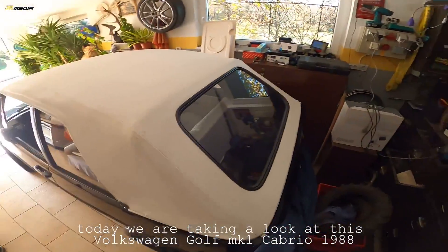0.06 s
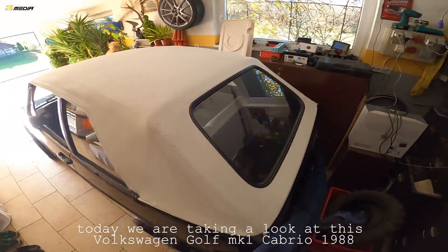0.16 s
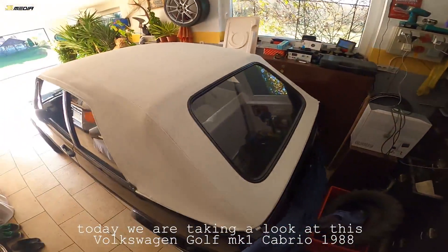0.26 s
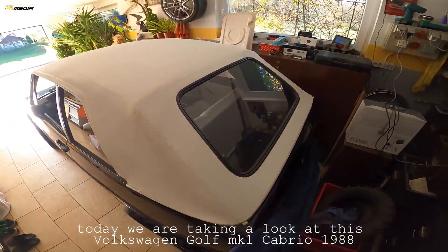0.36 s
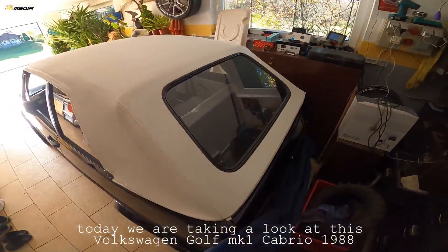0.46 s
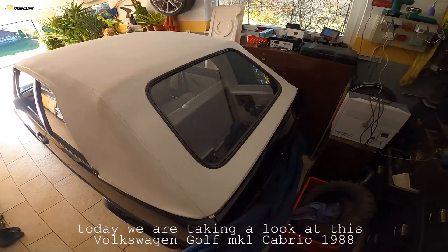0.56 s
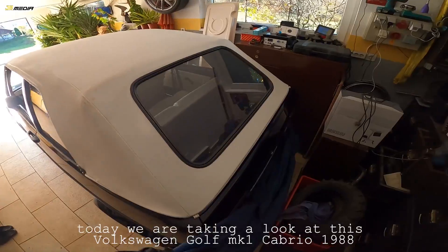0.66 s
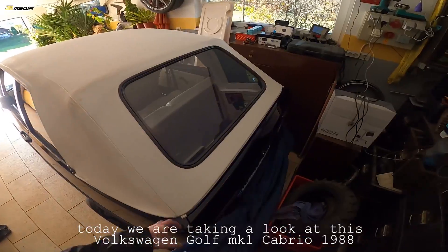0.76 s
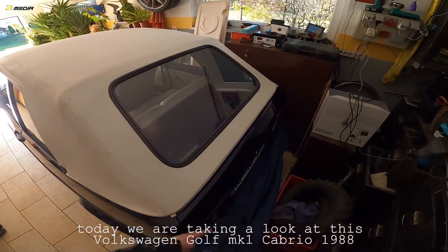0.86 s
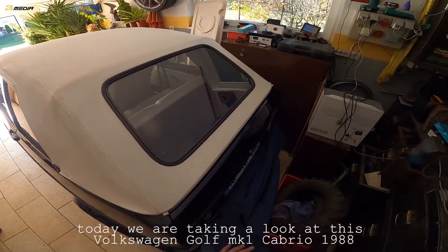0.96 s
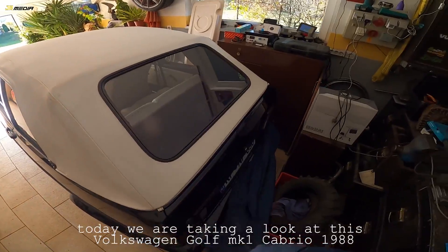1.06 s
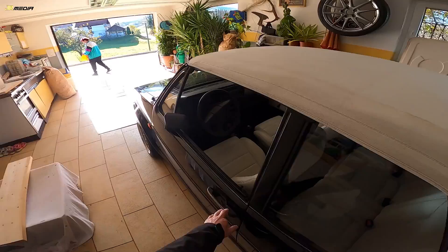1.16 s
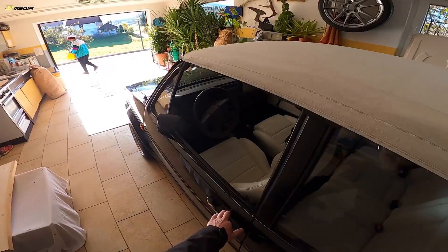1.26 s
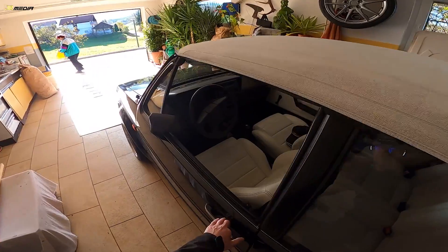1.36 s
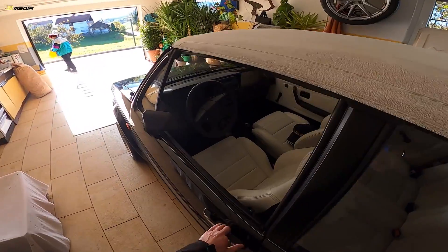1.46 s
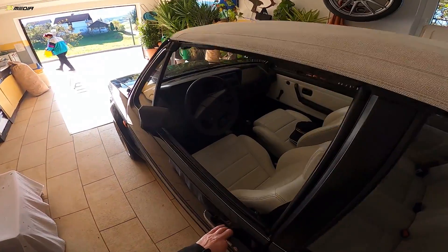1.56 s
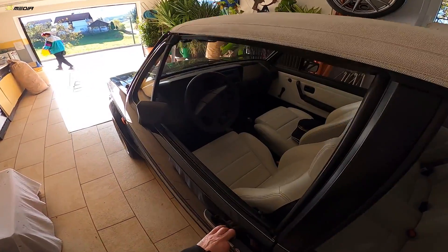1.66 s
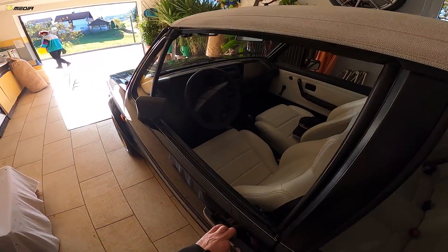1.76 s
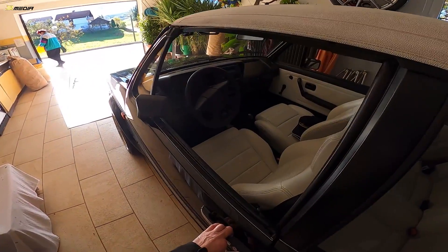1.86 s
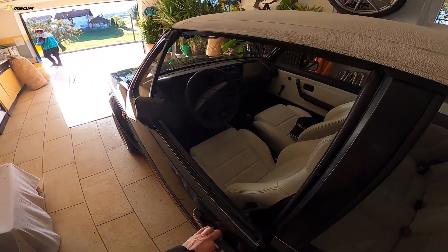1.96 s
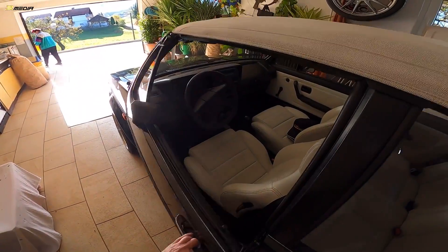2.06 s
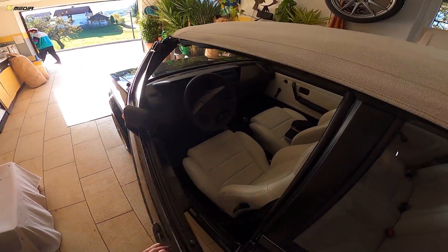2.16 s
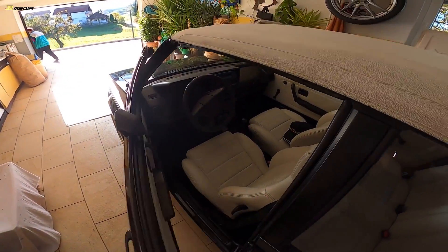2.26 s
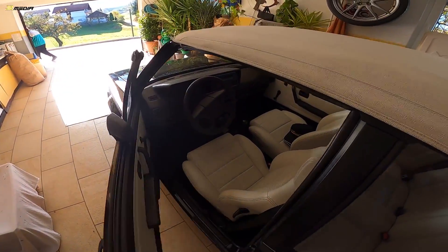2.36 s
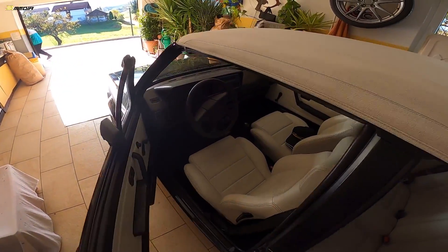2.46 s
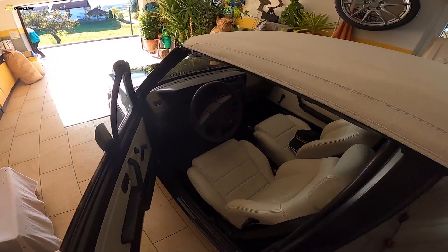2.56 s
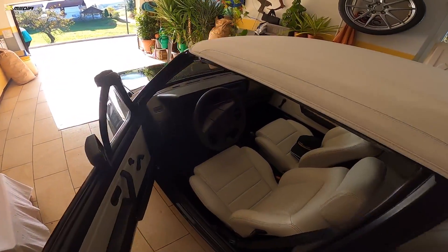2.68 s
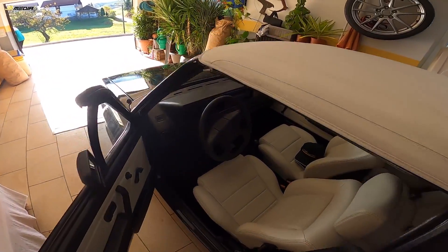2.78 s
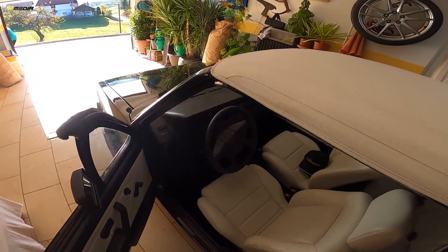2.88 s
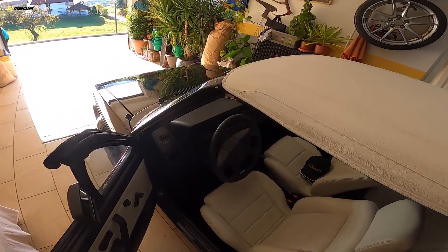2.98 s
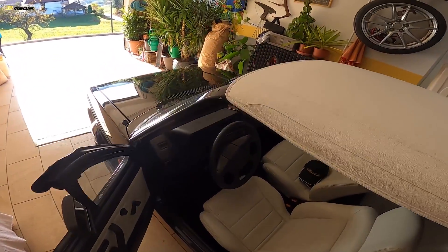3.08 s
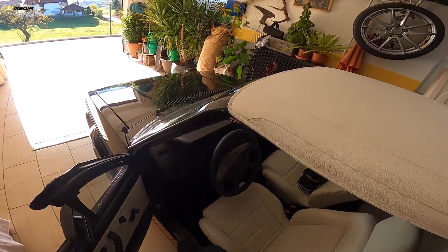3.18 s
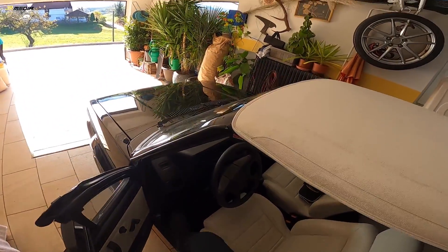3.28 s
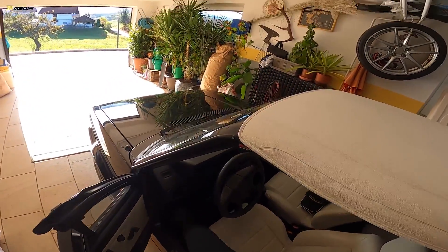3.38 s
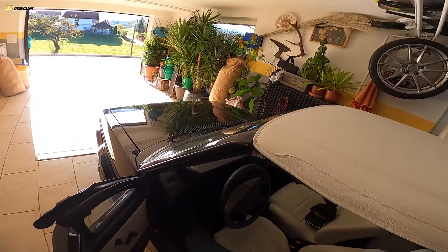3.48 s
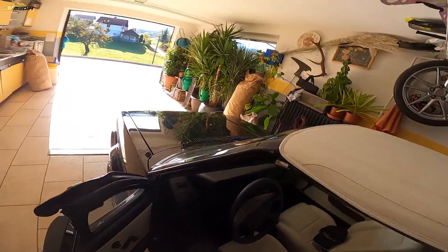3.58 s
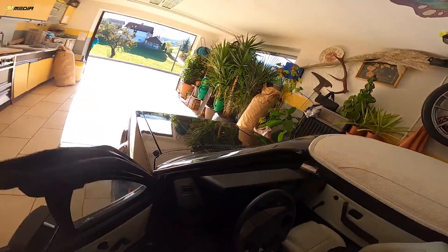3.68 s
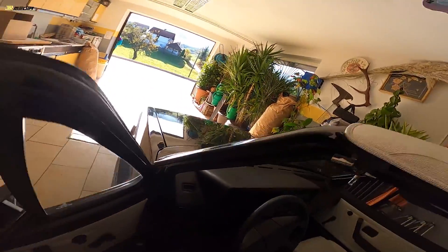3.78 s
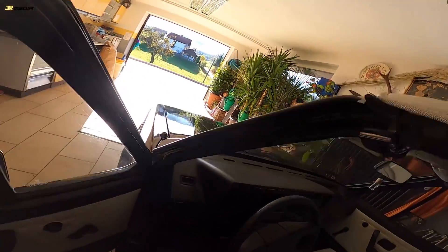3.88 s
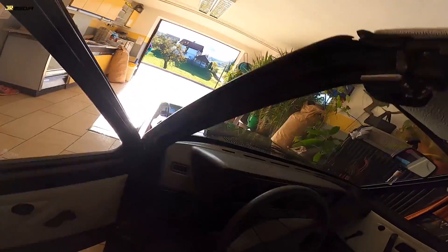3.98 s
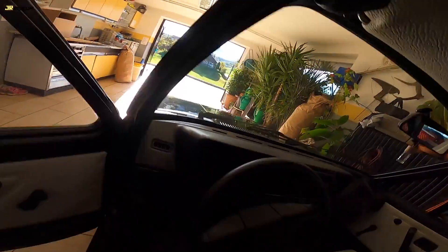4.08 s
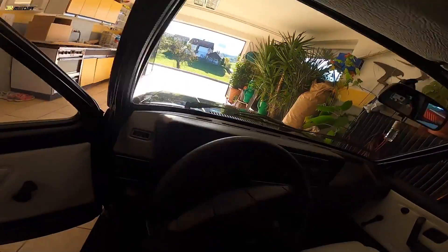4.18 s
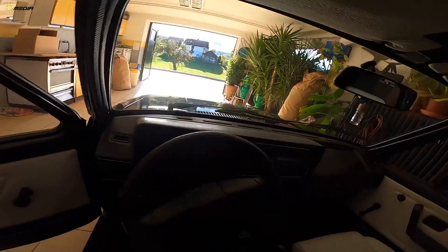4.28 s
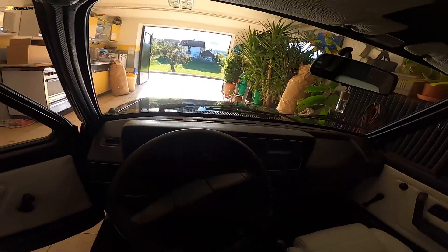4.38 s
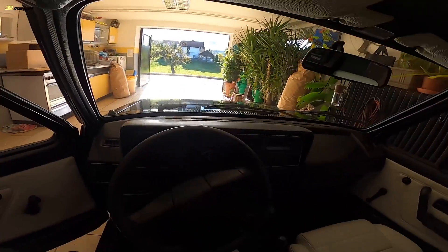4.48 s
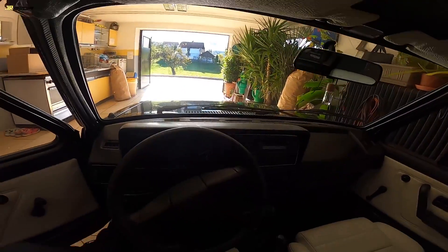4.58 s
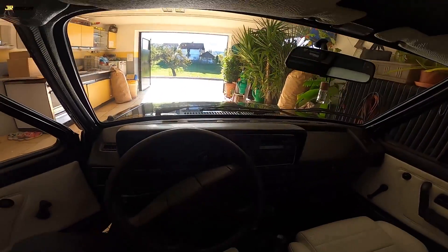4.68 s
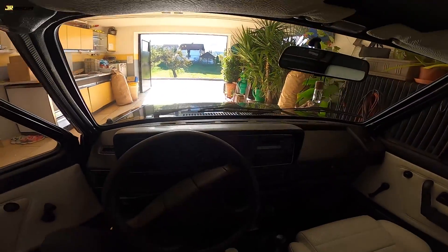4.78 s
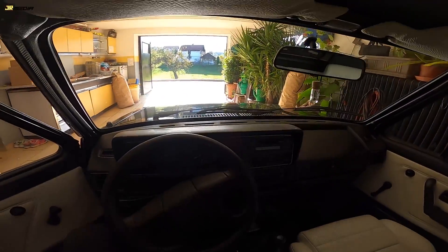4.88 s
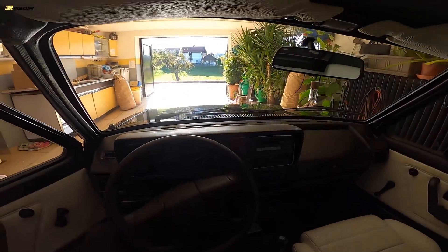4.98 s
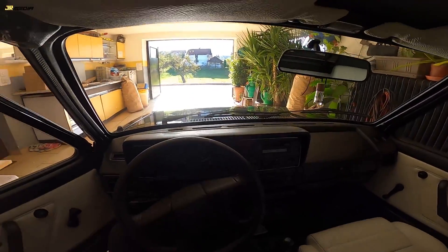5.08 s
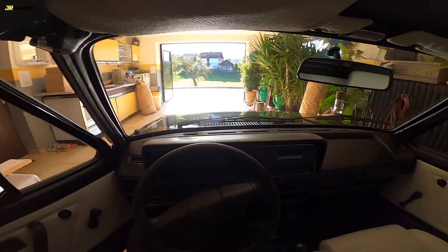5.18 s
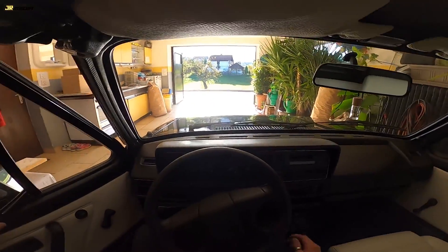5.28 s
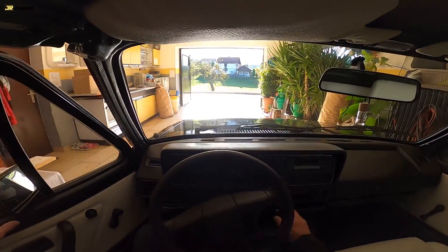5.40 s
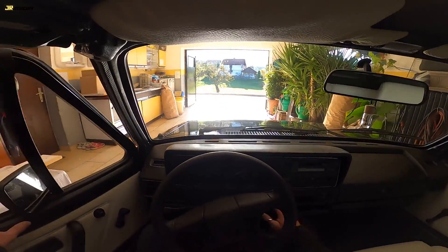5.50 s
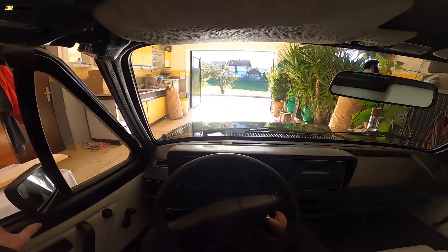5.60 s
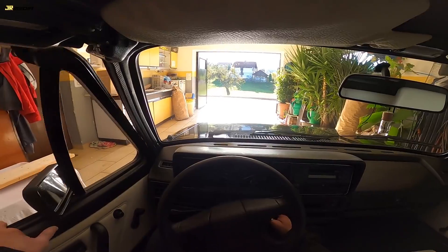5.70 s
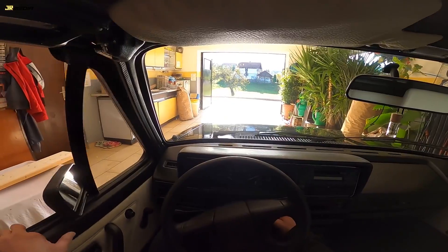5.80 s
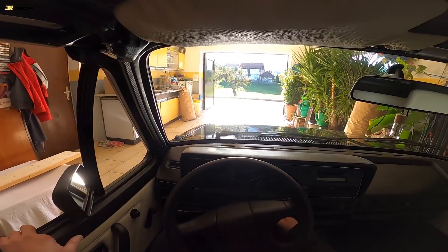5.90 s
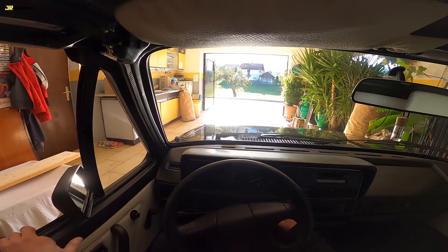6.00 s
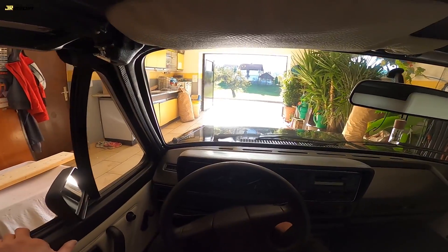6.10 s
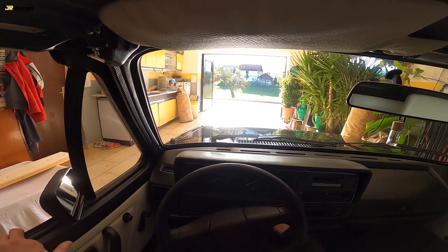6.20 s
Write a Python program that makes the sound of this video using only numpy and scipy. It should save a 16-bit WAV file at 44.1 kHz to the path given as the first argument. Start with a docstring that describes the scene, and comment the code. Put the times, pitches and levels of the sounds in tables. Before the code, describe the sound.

A body-worn microphone catches close nylon rustle and low cloth rubbing in a tiled garage, over very faint air noise. Fabric swishes upward around 0.7 s, and a rubber sole gives three tiny squeaks at 1.0 s. From 1.4 s the handle is felt with light clicks and soft knocks; a bright click and brief spring chatter come at 1.77, a dull bump at 1.93, then the steel latch snaps at 2.07. Cloth moves as the door swings, with a stiff snap at 2.94. Nylon swishes at 3.3, a solid thump lands at 3.94, and clustered thuds with low rocking and leathery seat creaks follow at 4.2-4.35. Quieter settling brings snaps and ticks until 5.4. A firm double knock hits at 5.67, then the door slams at 6.0, by far the loudest: latch crack, deep boom, and rattling rebounds with a short reflective tail.

```python
"""Close cloth rustle from a body-worn microphone: someone in a nylon jacket walks up to an old car in a tiled garage.
An arm's length away the handle clicks and the door is pulled open; they drop into the creaking seat, shift and slam it.
Damped sines and rung modes make the thuds, latch, spring and seat; dying noise bursts add the clicks and rattles.
Filtered noise that swells with each move makes the clothes, gliding blurred tones the squeak and nylon swishes.
Tiles return dense reflections of the hard sounds, over low rocking and faint air noise."""
import sys
import numpy as np
from scipy import signal
from scipy.fft import rfft, irfft, next_fast_len
from scipy.io import wavfile
from scipy.ndimage import uniform_filter1d, minimum_filter1d

SR = 44100
rng = np.random.default_rng(int(sys.argv[2]) if len(sys.argv) > 2 else 0)


def persist_wave(psi):
    """Save psi, clipped to +-1, as 16-bit WAV."""
    counts = np.round(np.clip(psi, -1, 1) * 32767).astype(np.int16)
    wavfile.write(sys.argv[1], SR, np.atleast_2d(counts).T)


N = 275404
TIME = np.arange(N) / SR   # s

# Event levels are relative dB, ahead of filters and mix; positive left-right dB leans left.
# Blows on the car and footfalls; from 6.044 s the door rebounds in its seals. Each row: start in seconds,
# knock level in dB, knock pitch in Hz, knock t60 in seconds, cabin boom in dB, rattle in dB,
# rattle brightness in Hz, rattle t60 in seconds.
THUD_EVENTS = [(1.423, -33.5, 235, 0.2, -57.5, -35, 600, 0.43),
               (1.664, -40, 273, 0.16, -64, -47, 400, 0.18), (1.760, -35.5, 233, 0.18, -74, -35, 594, 0.27),
               (1.855, -27.5, 234, 0.15, -65, -28, 500, 0.13),
               (1.926, -24.5, 135.5, 0.33, -30.5, -20.5, 1780, 0.16),
               (2.066, -49, 163, 0.18, -39, -32, 1510, 0.42),
               (2.48, -36.5, 191.6, 0.39, -77, -35.5, 700, 0.32),
               (3.191, -36, 182, 0.11, -53.5, -42, 590, 0.26), (3.409, -47, 154, 0.2, -68, -47, 350, 0.21),
               (3.795, -25, 206, 0.21, -60, -36, 400, 0.15), (3.866, -32, 122, 0.23, -49, -38, 1400, 0.065),
               (3.938, -11, 137, 0.084, -21.5, -21, 980, 0.1), (3.965, -21, 190, 0.065, -43, -36, 800, .08),
               (4.014, -53, 126, 0.098, -25.5, -52, 500, .1), (4.134, -31, 131, 0.2, -29.5, -40, 600, 0.18),
               (4.254, -16.5, 134.8, 0.35, -37, -24, 1400, 0.18),
               (4.257, -13.5, 205, 0.148, -45, -34, 1500, 0.042),
               (4.281, -20, 174, .08, -45, -20, 1400, .06),
               (4.303, -18.5, 281, 0.073, -43, -24, 1010, 0.11),
               (4.318, -13.5, 283, 0.043, -50, -21.5, 1300, 0.07),
               (4.831, -33.5, 167.5, 0.18, -42, -43, 500, 0.35),
               (5.251, -30.5, 202, 0.1, -47, -42, 400, 0.11), (5.437, -28.5, 187, 0.12, -46, -65, 396, .1),
               (5.6672, -7, 138, 0.12, -50, -19.5, 1280, 0.12),
               (5.68, -9.5, 205, 0.11, -38, -21, 1200, 0.078),
               (5.697, -24, 200, 0.067, -54, -21.5, 1480, 0.089),
               (5.728, -28.5, 504, 0.078, -63, -30, 800, 0.062),
               (5.775, -11.5, 127, 0.087, -42, -27, 1200, 0.18),
               (5.984, -23.5, 125, 0.12, -23.5, -49, 500, 0.096),
               (6.002, 0, 194.7, 0.11, -6, -16, 1820, 0.42), (6.011, -15, 210, .55, -2, -10, 463, 0.9),
               (6.044, -7.5, 295, 0.076, -27, -12, 2000, 0.23),
               (6.062, -2, 176, 0.079, -26, -28, 900, 0.15), (6.074, -10, 217, 0.13, -38, -16, 1300, 0.19),
               (6.098, -11.5, 364, 0.13, -24.5, -21.5, 1770, 0.23),
               (6.12, -7, 175, 0.12, -17, -21, 800, 0.13), (6.189, -19.5, 131, 0.15, -19, -44, 500, 0.12)]
# Steel catches of the lock and the door stay. Each row: start in seconds, lock ring in dB, door skin ring in dB,
# crack in dB, crack t60 in seconds, left-right balance in dB.
CATCH_EVENTS = [(1.929, -33, -36, -53, 0.025, 2), (2.066, -13, -52, -26.5, 0.02, 1.5),
                (2.070, -22.5, -50, -24, 0.043, 0.5), (2.086, -38, -48.5, -39, 0.027, 0),
                (5.671, -50, -39, -36.5, 0.037, -1), (5.976, -26, -45, -20, 0.027, 7.5),
                (5.986, -26, -51, -24.5, 0.098, 6), (5.998, -17.5, -29.5, -21.5, 0.19, 2.5),
                (6.047, -36, -29.5, -32, 0.04, 10)]
# Small clicks of handle, buckle and trim. Each row: start in seconds, level in dB, brightness in Hz,
# t60 in seconds, left-right balance in dB.
CLICK_EVENTS = [(1.422, -36, 5000, 0.05, 1.5), (1.568, -37.5, 4500, 0.012, 4),
                (1.753, -31.5, 7000, 0.024, 0.5), (1.769, -21.5, 14000, 0.012, 0),
                (1.773, -35.5, 6000, 0.1, 2), (1.849, -34.5, 3900, 0.064, 3),
                (1.921, -28.5, 4500, 0.062, -6), (1.926, -28, 8600, 0.028, 5),
                (2.051, -28, 3500, 0.021, -1), (2.187, -31, 4750, 0.072, 1.5),
                (2.442, -35.5, 10000, 0.04, 1), (2.452, -37, 12200, 0.14, 0), (2.478, -27, 5630, 0.057, 2),
                (3.856, -37, 1900, 0.048, 3), (3.915, -37, 2500, 0.12, 5), (3.932, -29, 3640, 0.042, 4),
                (4.465, -38.5, 2980, 0.056, 4), (4.791, -39.5, 4500, 0.039, 5),
                (5.699, -37, 3537, 0.025, 16), (5.795, -40, 4630, 0.071, 2.5),
                (5.86, -37.5, 2600, 0.042, 1)]
# Dry snaps of the door stay, trim and seat frame. Each row: start in seconds, level in dB, pitch in Hz,
# after-rattle level in dB, after-rattle t60 in seconds.
SNAP_EVENTS = [(2.865, -35, 1300, -44.5, 0.04), (2.9405, -19.5, 1960, -38, 0.074),
               (3.199, -34, 1500, -43, 0.02), (3.784, -37, 810, -45, .03), (3.9324, -17.5, 660, -38, .05),
               (4.586, -19.5, 477, -36.5, 0.036), (4.8924, -25, 1290, -44, .04),
               (4.8954, -29, 1700, -36, 0.034), (4.9375, -27, 1200, -36, 0.075),
               (4.944, -37, 950, -48, .03), (5.305, -29, 750, -36.5, .035)]
# Seat springs and leather give way under the weight. Each row: peak in seconds, rise in seconds, fall in seconds,
# level in dB.
CREAK_SWELLS = [(4.19, 0.046, .06, -44), (4.258, .012, 0.019, -32), (4.305, 0.037, 0.057, -28),
                (4.49, 0.071, 0.062, -42), (4.68, 0.16, 0.32, -49.5)]
# Single ticks of the seat frame. Each row: start in seconds, level in dB.
SEAT_TICK_EVENTS = [(4.699, -48), (4.845, -43.5), (5.211, -55.5), (5.327, -52)]
# Body moves: steps to the car, feeling for and pulling the handle (1.75, 2.03 s), swinging the door open (2.36 s),
# a leg going in (3.43 s), sliding on and settling (4.27, 4.72 s), reaching for the door (5.67 s).
# Each row: peak in seconds, rise in seconds, fall in seconds, cloth rustle in dB, low rubbing in dB re rustle,
# nylon hiss in dB re rustle.
BODY_MOVES = [(0.052, 0.077, 0.12, -41.5, -8, -9), (0.22, 0.47, 0.95, -47, -2.5, -14.5),
              (0.5, 0.051, 0.089, -47.5, 4.5, -34), (0.74, 0.21, 0.16, -39.5, -5.5, -10.5),
              (1.199, 0.34, 0.18, -44.5, -4.5, -12), (1.222, 0.033, 0.0064, -45, 0, -12),
              (1.75, 1, 0.22, -58.5, 3, -5), (2.03, 0.2, 0.085, -46, 3, -16.5),
              (2.36, 0.22, 0.4, -52, 3, -1), (2.84, 0.2, 0.087, -61, 7.5, 1.5),
              (3.429, 0.14, 0.15, -46.5, -0.5, -5.5), (3.7, 0.16, 0.11, -52.5, -32, -9),
              (3.96, 0.062, 0.055, -43, 7.5, -20), (4.271, 0.18, 0.089, -37, 0, -16),
              (4.72, 0.71, 0.39, -52, 4.5, -3), (5.25, 0.59, 0.17, -54, 1, -6),
              (5.67, 0.6, 0.091, -52, -11, -7), (5.96, 0.081, 0.098, -56, 5, 1)]
# Nylon brushes over nylon. Each row: start in seconds, length in seconds, starting pitch in Hz,
# pitch aimed for in Hz, level in dB.
NYLON_SWISHES = [(.66, 0.17, 1200, 3100, -45), (.965, 0.065, 2384, 2620, -47.5),
                 (3.31, .32, 2700, 3204, -44.5)]
# Nylon ribs whistle faintly as the leg lifts. Each row: start in seconds, length in seconds, starting pitch in Hz,
# pitch aimed for in Hz, level in dB.
RIB_WHISTLES = [(3.24, .17, 6000, 11000, -67)]
# A rubber sole catches three times on the tiles. Each row: start in seconds, length in seconds,
# starting pitch in Hz, pitch aimed for in Hz, level in dB.
SOLE_SQUEAKS = [(.977, 0.041, 1247, 1410, -43), (1.012, 0.042, 1400, 1430, -43),
                (1.051, .036, 1480, 1530, -43.5)]
# Steps jog the microphone mount; the car rocks when pulled, loaded or slammed. Each row: peak in seconds,
# rise in seconds, fall in seconds, level in dB.
ROCKING_SWELLS = [(.77, 0.11, 0.21, -46), (2.09, 0.11, 0.12, -44), (2.965, 0.038, 0.052, -49.5),
                  (3.88, 0.051, 0.05, -38), (4.23, 0.19, 0.25, -26), (4.8, 0.59, 0.68, -40.5),
                  (5.85, 0.048, 0.087, -37), (6.05, 0.031, 0.7, -20)]

# Ringing modes of the cabin air. Each row: pitch in Hz, level in dB, t60 in seconds.
CABIN_MODES = [(33.1, -5, 0.9), (59.3, 5.5, 0.28), (47, -2.5, 0.26)]
# Ringing modes of the steel lock. Each row: pitch in Hz, level in dB, t60 in seconds.
LOCK_MODES = [(945, -19, 0.17), (1025, -18, 0.18), (1118, -15.5, 0.11), (1235, -16, 0.074),
              (1500, -13.5, 0.03), (1916, -8, 0.018), (2160, -1, 0.023), (2044, -22, 0.13),
              (2244, -22.5, 0.15), (2330, -20, 0.05), (2630, -15.5, 0.058), (3320, -23, 0.084),
              (4030, -35, 0.11), (5590, -22, 0.085), (7370, -24, .12), (8550, -27, .04)]
# Ringing modes of the door's sheet metal. Each row: pitch in Hz, level in dB, t60 in seconds.
DOOR_SKIN_MODES = [(180.3, -4.5, 0.35), (210, -0.5, 0.37), (266, -11, 0.44), (323, -5, 0.5),
                   (390.5, -10.5, 0.32), (460, -3, 0.35), (484, 3, 0.27), (586, 3, 0.26), (638, 2.5, 0.2),
                   (778, -5, 0.4), (960, -24, 0.48), (1200, 1, 0.15)]
# Ringing modes of the handle's return spring. Each row: pitch in Hz, level in dB, t60 in seconds.
SPRING_MODES = [(1270, -13, 0.091), (1520, -9, 0.11), (3180, -2, 0.035), (3420, -3, 0.03),
                (3850, -3, 0.027), (7000, 2, 0.008)]
# Ringing modes of the seat. Each row: pitch in Hz, level in dB, t60 in seconds.
SEAT_MODES = [(300, -4, 0.11), (500, -10, 0.05), (776, 1, 0.031), (950, 6, 0.027), (1116, -2, 0.026),
              (1235, -0.5, 0.043), (1362, -0.5, 0.046), (1650, -3, 0.018), (2500, -11, 0.033),
              (3300, -15, 0.015)]
# Ringing modes of the key ring. Each row: pitch in Hz, level in dB, t60 in seconds.
KEY_MODES = [(11540, -41, .11), (12460, -49, .1)]

# Spectrum of glass and trim shaking. Each row: frequency in Hz, density in dB per Hz.
RATTLE_SPECTRUM = [(40, -39), (100, 2.5), (160, 5.5), (250, 4), (480, 2), (750, -5), (1200, -2.5),
                   (2500, -7.5), (5000, -3.5), (9000, -3), (14000, -9.5)]
# Spectrum of steel cracking on steel. Each row: frequency in Hz, density in dB per Hz.
CRACK_SPECTRUM = [(200, -53), (700, -21), (1200, 4.5), (2100, 10.5), (3100, 2.5), (4000, 4.5), (5500, -5.5),
                  (8000, 3), (10000, -11), (14000, -34)]
# Spectrum of light parts clicking. Each row: frequency in Hz, density in dB per Hz.
CLICK_SPECTRUM = [(100, -8), (500, 5.5), (1500, 9.5), (3200, 7), (4800, 4.5), (7200, 2.5), (9500, -5.5),
                  (14000, -19)]
# Spectrum of low rubbing of the clothes. Each row: frequency in Hz, density in dB per Hz.
RUB_SPECTRUM = [(60, -22), (130, -6.5), (240, 3), (400, -2.5), (700, -14.5), (1500, -48.5)]
# Spectrum of cloth rustle. Each row: frequency in Hz, density in dB per Hz.
CLOTH_SPECTRUM = [(200, -24), (500, -3), (1200, 4.5), (2000, 0.5), (3100, -3), (4500, -8), (9000, -50.5)]
# Spectrum of nylon hiss. Each row: frequency in Hz, density in dB per Hz.
NYLON_SPECTRUM = [(1500, 5), (3500, 2.5), (5000, 7.5), (6300, 4.5), (8000, 4.5), (9500, -6.5), (12200, -10),
                  (15000, -27)]
# Spectrum of mount and car rumble. Each row: frequency in Hz, density in dB per Hz.
RUMBLE_SPECTRUM = [(15, -10), (32, 7.5), (55, -0.5), (85, -8), (140, -9.5), (400, -69.5)]
# Spectrum of the faint air noise. Each row: frequency in Hz, density in dB per Hz.
AIR_SPECTRUM = [(25, -6), (80, -9), (200, -2), (600, -16), (1500, 5.5), (4000, -4.5), (8000, -11),
                (10000, -18), (15000, -37)]
# How unlike the two ears are. Each row: frequency in Hz, side level in dB re mid.
STEREO_WIDTH = [(60, -10.5), (150, -24), (500, -14.5), (1500, -8.5), (4000, -3), (8000, -42), (14000, -28)]
# Decay of the garage. Each row: frequency in Hz, t60 in seconds.
GARAGE_DECAY = [(100, 0.42), (400, 0.2), (1500, 0.2), (5000, 0.22), (12000, 0.16)]

CHATTER_DB, CHATTERS_PER_S = 2.5, 300   # unevenness of loose parts colliding, and its rate
SNAP_CYCLES, REBOUND_S, REBOUND_DB = 4.1, 0.0012, -17.5   # cycles until a snap is 60 dB down; one bounce
SPRING_S, SPRING_DB, SPRING_GAP_S, SPRING_LOSS_DB = 1.769, -31, 0.00343, 5   # loss is per touch
JERKS_PER_S, JERK_SCATTER, JERK_SPREAD_DB = 150, 0.35, 3   # nominal rate, unevenness of gaps and of strength
SWELL_SHAPE = 1.58   # 1 = pointed, 2 = bell
STIR_DB = -71   # the cloth is never quite still
MOUNT_DB = -10.5   # rumble of the microphone mount, re the low rubbing
CRINKLES_PER_S, CRINKLE_DB, CRINKLE_SPREAD_DB = 160, -11, 2.5   # popping creases: rate, level re rustle, unevenness
PORT_LAG_S = 0.000016   # sound reaches the left microphone port this much later
CEILING_DB, RELEASE_DB_PER_S, LOOK_AHEAD_S = -3, 8, 0.0033   # limiter
CUTOFF_HZ = 16300   # from here up the treble is at least 70 dB down


def thuds(overtone=1.38, overtone_db=-6, soft_hz=150, contact_s=0.0025):
    """A padded blow sets the struck panel ringing, pumps the cabin air and shakes glass and trim."""
    t = np.arange(SR // 2) / SR
    knock, pump = np.zeros((2, N))
    shake = np.zeros((2, N))
    for s, knock_db, hz, knock_t60, boom_db, rattle_db, bright_hz, rattle_t60 in THUD_EVENTS:
        reach = min(soft_hz / hz, 1) ** 3   # padding barely stirs the higher overtones
        swing = np.sin(2 * np.pi * hz * t)
        swing = swing + reach * amp(overtone_db) * np.sin(2 * np.pi * overtone * hz * t)
        onset = 1 - np.exp(-t / contact_s)   # soft contact, gentle start
        fade = np.exp(-np.log(1000) * t / knock_t60)
        add(knock, s, -amp(knock_db) * swing * fade * onset)
        add(pump, s, amp([boom_db]))
        chatter = burst(rattle_t60, apart=0.16, grain_db=CHATTER_DB)
        add(shake, s, amp(rattle_db + 3.0) * lowpass(chatter, bright_hz))
    boom = lowpass(ring(pump, CABIN_MODES, opposed=True), 114)
    return knock + colour(shake, RATTLE_SPECTRUM) * ears(0.82), boom


def catches():
    """Steel snaps over steel: a crack, and the lock and the door's sheet metal ring."""
    lock, skin, crack = np.zeros((3, 2, N))
    for s, ring_db, skin_db, crack_db, t60, pan_db in CATCH_EVENTS:
        add(lock, s, amp(ring_db) * ears(pan_db))
        add(skin, s, amp(skin_db) * ears(pan_db / 2))
        add(crack, s, amp(crack_db) * ears(pan_db) * burst(t60, apart=1.0, grain_db=CHATTER_DB))
    lock_ring = ring(lock, LOCK_MODES, opposed=True)
    skin_ring = ring(skin, DOOR_SKIN_MODES, opposed=True)
    return lock_ring + skin_ring + colour(crack, CRACK_SPECTRUM)


def clicks():
    """Light parts snap as short noise bursts and soon die away."""
    out = np.zeros((2, N))
    for s, db, bright_hz, t60, pan_db in CLICK_EVENTS:
        add(out, s, amp(db) * ears(pan_db) * lowpass(burst(t60, apart=0.31), bright_hz))
    return colour(out, CLICK_SPECTRUM)


def snaps():
    """A stiff part jumps with one solid swing, bounces once and leaves its surroundings rattling."""
    t = np.arange(SR // 10) / SR
    swings, rattle = np.zeros(N), np.zeros((2, N))
    for s, db, hz, rattle_db, t60 in SNAP_EVENTS:
        fade = np.exp(-np.log(1000) * hz * t / SNAP_CYCLES)
        swing = amp(db) * np.sin(2 * np.pi * hz * t) * fade
        add(swings, s, swing)
        add(swings, s + REBOUND_S, amp(REBOUND_DB) * swing)
        add(rattle, s, amp(rattle_db) * burst(t60, apart=0.32, grain_db=CHATTER_DB))
    return lowpass(swings + colour(rattle, CLICK_SPECTRUM), 2640) * ears(2.2)


def spring(count=5):
    """Let go, the handle's return spring chatters against its seat, each touch weaker and ringing its modes."""
    touches = []
    for k, uneven in enumerate(rng.uniform(0.74, 1.2, count)):
        touches.append((SPRING_S + SPRING_GAP_S * k * uneven, SPRING_DB - SPRING_LOSS_DB * k))
    return ring(taps(touches), SPRING_MODES, opposed=True) * ears(1.5)


def seat(slips_per_s=1600, fine_db=-6, snap_db=-11):
    """Leather and springs stick and slip in uneven jerks with finer slips between; the frame ticks."""
    gap, strength = rng.standard_normal((2, N // 100))
    jerk_s = np.cumsum(np.exp(JERK_SCATTER * gap)) / JERKS_PER_S
    jerks = taps(zip(jerk_s, JERK_SPREAD_DB * strength))
    slips = (rng.random(N) < slips_per_s / SR) * rng.standard_normal(N)
    force = rms_one(jerks) + amp(fine_db) * rms_one(slips)
    ringing = rms_one(ring(force, SEAT_MODES, opposed=True))
    snapping = rms_one(lowpass(colour(force, CLICK_SPECTRUM), 2800))
    creak = swells(CREAK_SWELLS) * (ringing + amp(snap_db) * snapping)
    ticks = ring(taps(SEAT_TICK_EVENTS), SEAT_MODES, opposed=True)
    return (creak + ticks) * ears(1.9)


def clothes():
    """Jacket and trousers rub, rustle and hiss with every move, and jog the microphone mount."""
    rubbing = swells([(s, rise, fall, db + rub_db) for s, rise, fall, db, rub_db, _ in BODY_MOVES])
    rustling = swells([move[:4] for move in BODY_MOVES])
    hissing = swells([(s, rise, fall, db + nylon_db) for s, rise, fall, db, _, nylon_db in BODY_MOVES])
    flutter_db = 1.6 * drift(35)   # rustle and hiss waver together
    rub = np.hypot(rubbing, amp(STIR_DB)) * amp(3.7 * drift(15)) * noise(RUB_SPECTRUM)
    texture = noise(CLOTH_SPECTRUM, grain_db=0.5) + amp(CRINKLE_DB) * crinkles()
    cloth = np.hypot(rustling, amp(STIR_DB)) * amp(flutter_db - 1.94) * texture
    nylon = hissing * amp(flutter_db + 2.5) * noise(NYLON_SPECTRUM, grain_db=1.0)
    mount = amp(MOUNT_DB) * rubbing * noise(RUMBLE_SPECTRUM)
    return rub + mount + reflected(cloth + nylon, delay_s=0.0037, share=0.049) * ears(1.3)


def crinkles():
    """Creases pop at random, most of them small and a few distinct."""
    spread = np.minimum(rng.exponential(1, N), 3)
    sizes = amp(CRINKLE_SPREAD_DB * spread) * rng.choice([-1, 1], N)
    pops = sizes * (rng.random(N) < CRINKLES_PER_S / SR)
    return rms_one(colour(pops, CLOTH_SPECTRUM))


def swish():
    """Nylon brushes over nylon, higher as it slides faster."""
    return friction_tone(NYLON_SWISHES, width_hz=640, blur=0.94, arc=0.58, fullness=1.7, octave_db=-10)


def whistle():
    """Nylon ribs slide past each other at a rising rate and whistle faintly."""
    return friction_tone(RIB_WHISTLES, width_hz=120, blur=0.45, arc=0.3, fullness=0.57, octave_db=-40,
                         wander=0.012)


def squeak():
    """A rubber sole sticks and slips on the tiles with a narrow, wavering tone."""
    return friction_tone(SOLE_SQUEAKS, width_hz=90, blur=0.53, arc=0.442, fullness=0.46, octave_db=-9.5,
                         wander=0.0285)


def keys():
    """One tap sets the high modes of the key ring sounding."""
    return ring(np.arange(N) == int(5.793 * SR), KEY_MODES, opposed=True) * ears(-2)


def rocking():
    """Low sway of the jogged microphone mount and the car, as swelling rumble noise."""
    return swells(ROCKING_SWELLS) * noise(RUMBLE_SPECTRUM)


def garage(x, gap_s=0.0013, wider_db=3):
    """Dense reflections from tiles and walls, with decay and stereo width set band by band."""
    t, echo = np.arange(SR // 2) / SR, 0
    edges = np.geomspace(60, 15360, 9)   # octave bands, Hz
    for low, high in zip(edges, edges[1:]):
        hz = np.sqrt(low * high)
        tail = burst(at_hz(GARAGE_DECAY, hz), amp(at_hz(STEREO_WIDTH, hz) + wider_db))
        band = signal.butter(2, [low, high], "band", fs=SR, output="sos")
        echo = echo + signal.sosfilt(band, tail)
    echo = echo * (1 - np.exp(-(t / gap_s) ** 2))   # reflections build up after a short gap
    return signal.fftconvolve(x, rms_one(echo) / np.sqrt(len(t)), axes=-1)[:, :N]


def air():
    """Faint steady broadband noise behind everything."""
    return amp(-62.0) * noise(AIR_SPECTRUM)


def friction_tone(rows, width_hz, blur, arc, fullness, octave_db, wander=0):
    """Stick and slip: a blurred line follows the sliding speed (arc up to .5 only speeds up, 1 slows down again)."""
    out = 0
    for s, length_s, start_hz, aim_hz, db in rows:
        along = np.clip((TIME - s) / length_s, 0, 1)
        hz = start_hz + (aim_hz - start_hz) * np.sin(np.pi * arc * along)
        hz = hz * (1 + wander * drift(300))
        pressure = (4 * along * (1 - along)) ** fullness
        phase = 2 * np.pi * np.cumsum(hz) / SR
        a, b = blur * rms_one(lowpass(rng.standard_normal((2, N)), width_hz))
        steady = np.sqrt(2 * (1 - blur ** 2))
        line = (a + steady) * np.sin(phase) + b * np.cos(phase)
        octave = amp(octave_db) * a * np.sin(2 * phase)
        out = out + amp(db) * pressure * (line + octave)
    return out * ears(5.6)


def reflected(x, delay_s, share):
    """A surface close to the microphone adds one early echo, which ripples the spectrum."""
    return x + share * np.array([np.interp(TIME - delay_s, TIME, ear) for ear in x])


def ring(force, modes, opposed=False):
    """A click sets every mode ringing at its own level; struck off centre, neighbours swing opposite ways."""
    out = 0
    for k, (hz, db, t60) in enumerate(modes):
        r, w = amp(-60 / (t60 * SR)), 2 * np.pi * hz / SR   # decay and turn per sample
        sign = (-1) ** k if opposed else 1
        mode = signal.lfilter([0, np.sin(w)], [1, -2 * r * np.cos(w), r * r], force + 1e-18)
        out = out + sign * amp(db) * mode
    return out


def burst(t60, apart, grain_db=0):
    """Stereo chatter of many close modes dying together, grainy where loose parts collide."""
    t = np.arange(SR // 2) / SR
    mid, side, knots = rng.standard_normal((3, len(t)))
    grain_curve = np.interp(t * CHATTERS_PER_S, np.arange(len(t)), knots)
    grain = rms_one(amp(grain_db * grain_curve))
    return (mid + apart * side * np.array([[1], [-1]])) * grain * amp(-60 * t / t60)


def noise(spectrum, grain_db=0):
    """Stereo noise of unit rms; fibres catching and letting go can make it grainy."""
    mid, side = rng.standard_normal((2, N)) * amp(grain_db * drift(700))
    side = colour(rms_one(side), STEREO_WIDTH, level=True)
    return rms_one(colour(rms_one(mid) + side * np.array([[1], [-1]]), spectrum))


def swells(rows):
    """Gain of overlapping efforts, each rising to its peak and fading; their powers add."""
    power = 0
    for s, rise_s, fall_s, db in rows:
        away = np.maximum((s - TIME) / rise_s, (TIME - s) / fall_s)
        power = power + (amp(db) * np.exp(-away ** SWELL_SHAPE)) ** 2
    return np.sqrt(power)


def taps(rows):
    """One click for each (seconds, dB)."""
    out = np.zeros(N)
    for s, db in rows:
        add(out, s, amp([db]))
    return out


def colour(x, spectrum, level=False):
    """Causal (minimum-phase) filter; white noise keeps its power unless the table is a level."""
    size = next_fast_len(N + SR // 2, True) // 2 * 2
    gain = amp(at_hz(spectrum, np.arange(size // 2 + 1) * SR / size))
    cepstrum = irfft(np.log(gain if level else rms_one(gain)))
    cepstrum[1:size // 2] *= 2   # fold onto positive time
    cepstrum[size // 2 + 1:] = 0
    return irfft(rfft(x, size) * np.exp(rfft(cepstrum)))[..., :N]


def lowpass(x, hz):
    """A softer contact loses its treble."""
    return signal.sosfilt(signal.butter(2, np.clip(hz, 20, SR / 2.2), fs=SR, output="sos"), x)


def drift(rate):
    """Random curve in straight lines between normal draws, rate of them a second."""
    knots = rng.standard_normal(N // 20)
    return np.interp(TIME * rate, np.arange(len(knots)), knots)


def at_hz(points, hz):
    """Read a table on a log-frequency axis."""
    f, value = np.transpose(points)
    return np.interp(np.log(np.maximum(hz, 1)), np.log(f), value)


def amp(db):
    """Decibels to gain."""
    return 10 ** (np.asarray(db) / 20)


def rms_one(x):
    """Scale to unit rms."""
    return x / np.sqrt(np.mean(x ** 2) + 1e-20)


def ears(left_right_db):
    """Gains of the two channels."""
    return amp(np.array([[0.5], [-0.5]]) * left_right_db)


def add(track, s, sound):
    """Mix a sound in at time s."""
    start = int(s * SR)
    track[..., start:start + sound.shape[-1]] += sound[..., :max(N - start, 0)]


def limiter(x):
    """The gain drops just ahead of a peak and recovers slowly."""
    peak_db = 20 * np.log10(np.abs(x).max(axis=0) + 1e-9)
    over_db = np.maximum(peak_db - CEILING_DB, 0)
    release_db = RELEASE_DB_PER_S * TIME
    cut_db = np.maximum.accumulate(over_db + release_db) - release_db
    size = 2 * int(LOOK_AHEAD_S * SR) + 1
    return x * amp(uniform_filter1d(minimum_filter1d(-cut_db, size), size))


def scene():
    """Hard sounds carry into the garage; the clothes stay close to the microphone."""
    knocks, boom = thuds()
    small = clicks() + snaps() + spring()
    steel = catches()
    hard = knocks + boom + small + steel + keys()
    tones = squeak() + swish() + whistle()
    rumble = rocking()
    room = garage(amp(-9.0) * small + amp(-4.5) * steel + amp(-13.5) * knocks)
    return hard + tones + seat() + clothes() + rumble + room + air()


def record(dry):
    """Sound reaches the left port a little later; peaks are held down and the top is cut."""
    size = next_fast_len(N + SR // 2, True) // 2 * 2
    hz = np.arange(size // 2 + 1) * SR / size
    left = irfft(rfft(dry[0], size) * np.exp(-2j * np.pi * hz * PORT_LAG_S))[:N]
    held = limiter(np.array([left, dry[1]]))
    return signal.sosfilt(signal.cheby2(12, 70, CUTOFF_HZ, fs=SR, output="sos"), held)


dry = scene()
out = record(dry)
persist_wave(out)
```